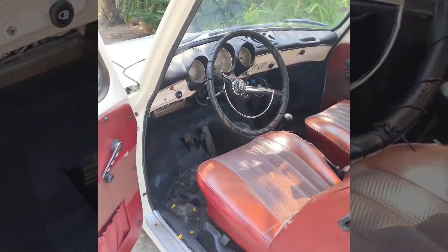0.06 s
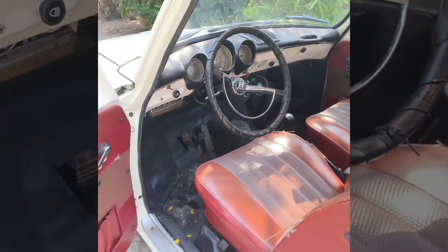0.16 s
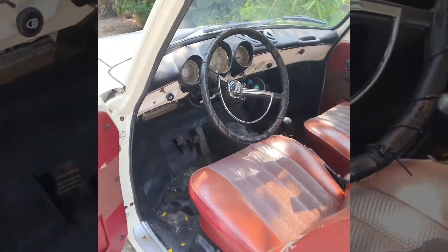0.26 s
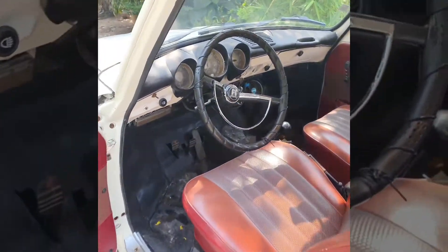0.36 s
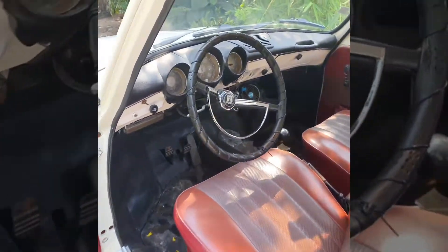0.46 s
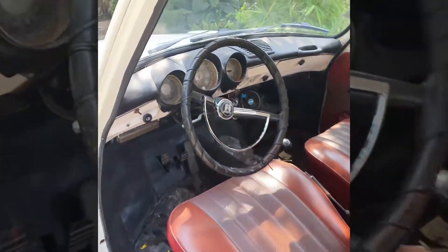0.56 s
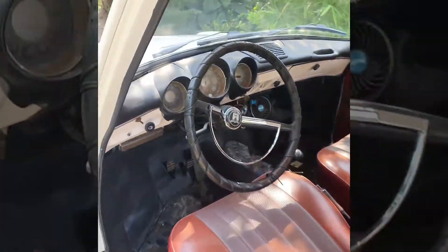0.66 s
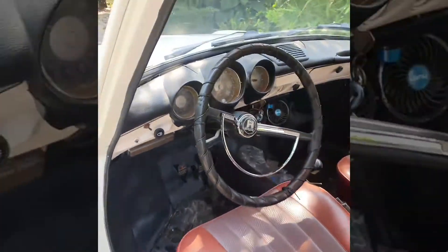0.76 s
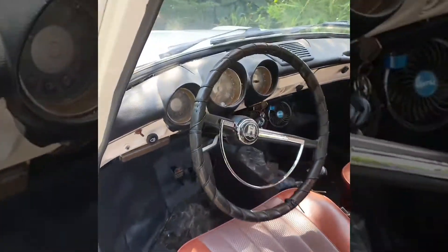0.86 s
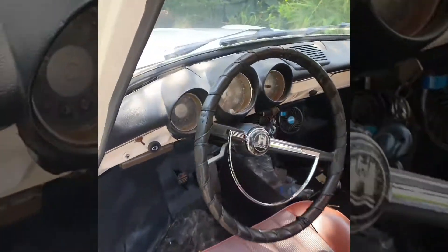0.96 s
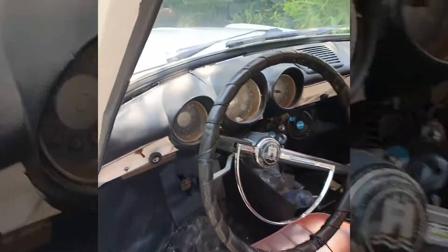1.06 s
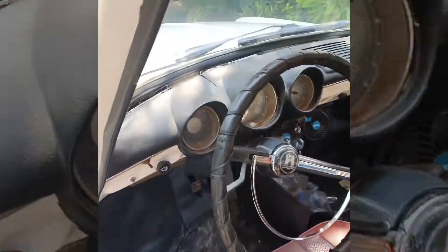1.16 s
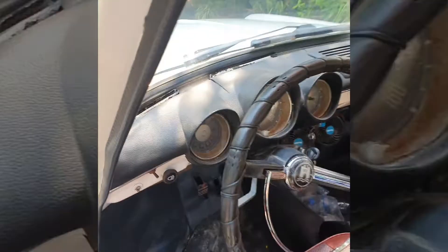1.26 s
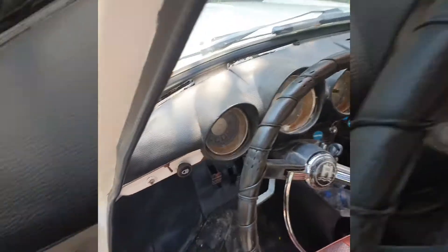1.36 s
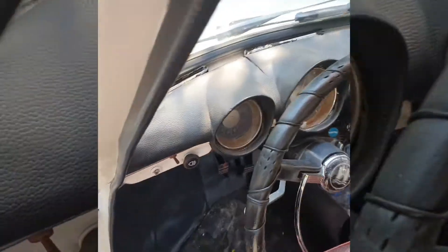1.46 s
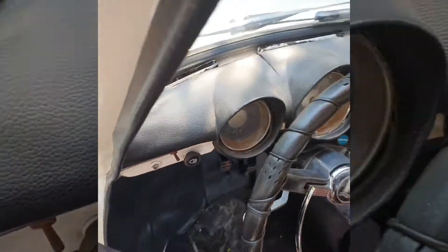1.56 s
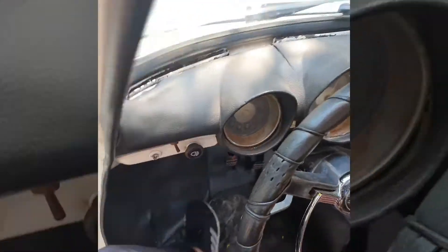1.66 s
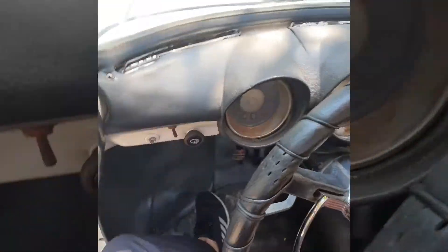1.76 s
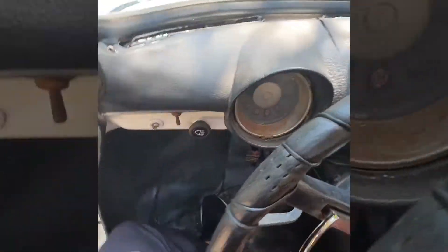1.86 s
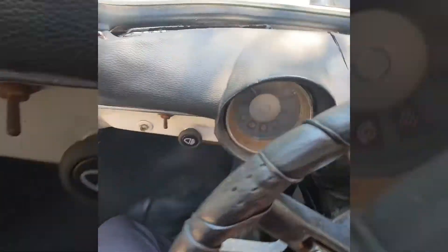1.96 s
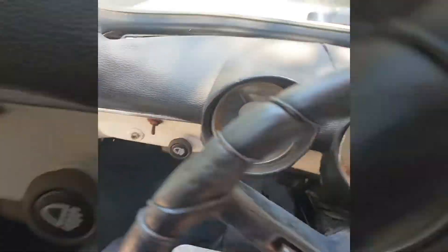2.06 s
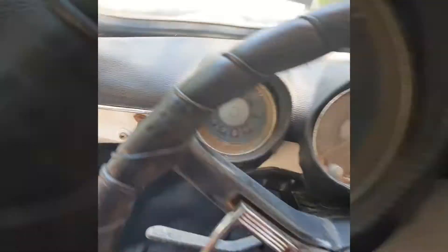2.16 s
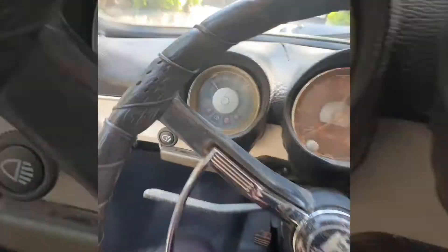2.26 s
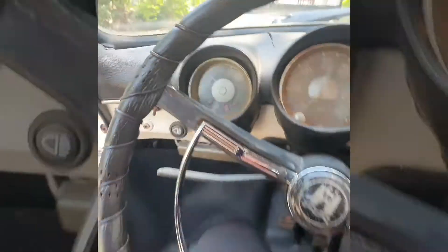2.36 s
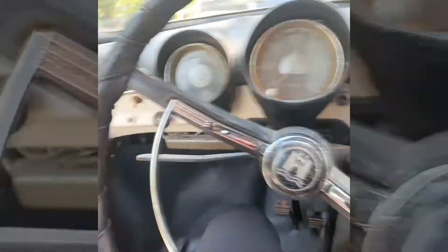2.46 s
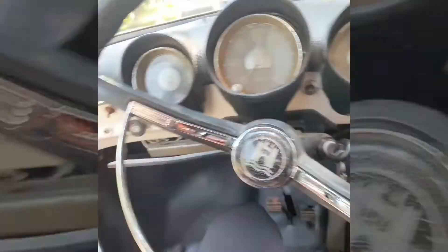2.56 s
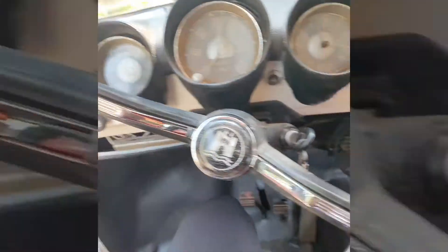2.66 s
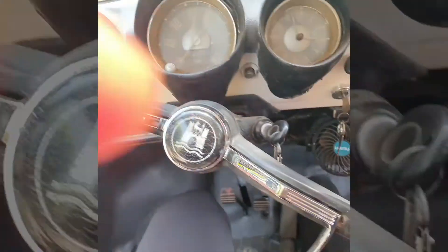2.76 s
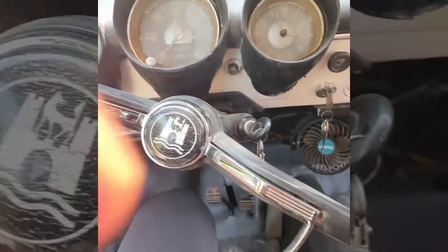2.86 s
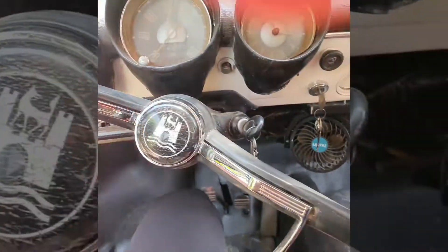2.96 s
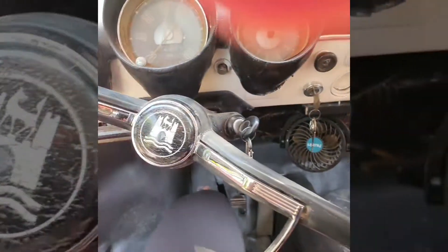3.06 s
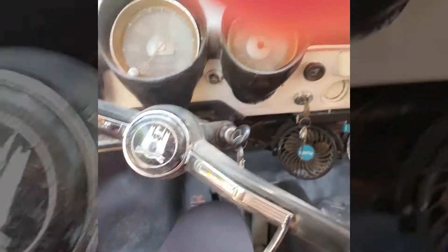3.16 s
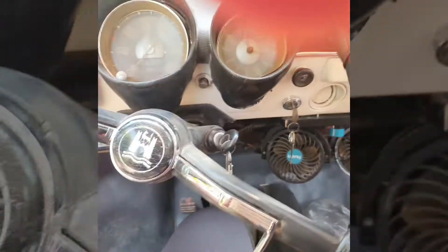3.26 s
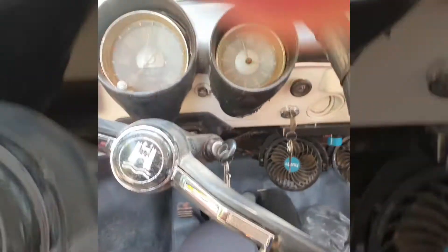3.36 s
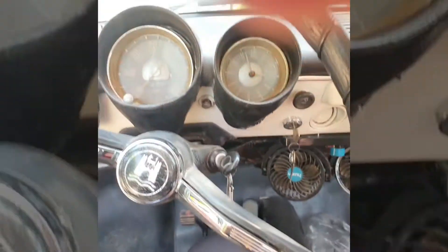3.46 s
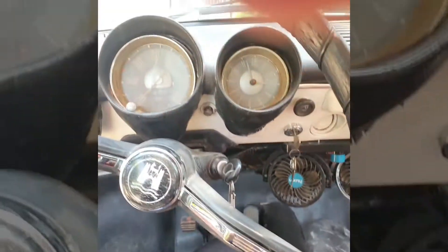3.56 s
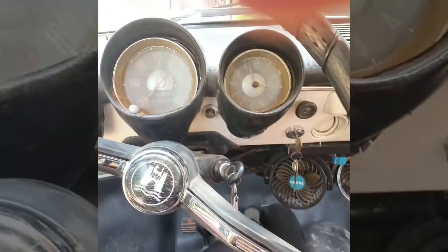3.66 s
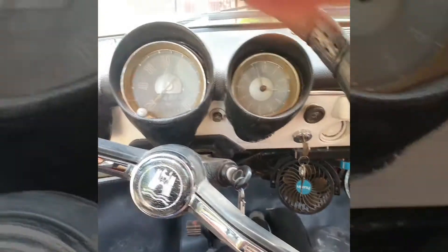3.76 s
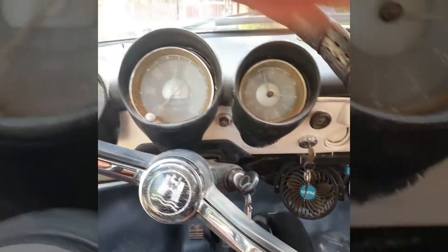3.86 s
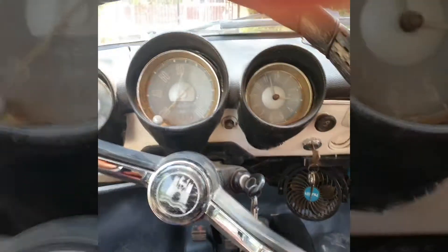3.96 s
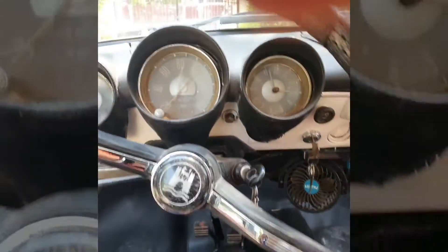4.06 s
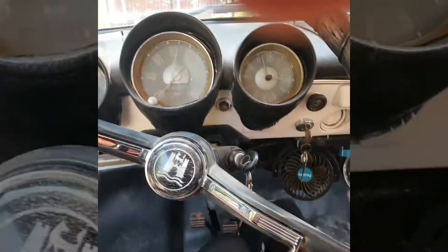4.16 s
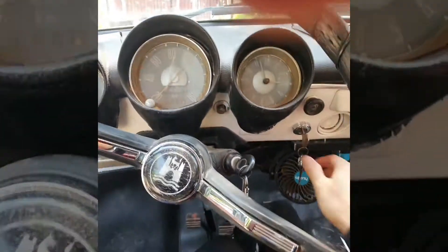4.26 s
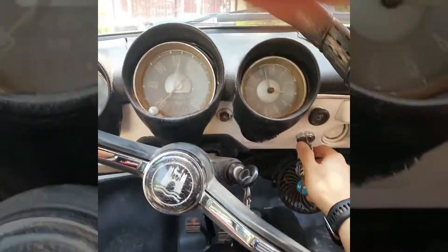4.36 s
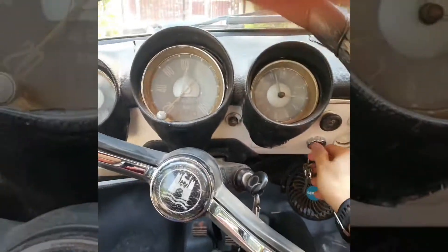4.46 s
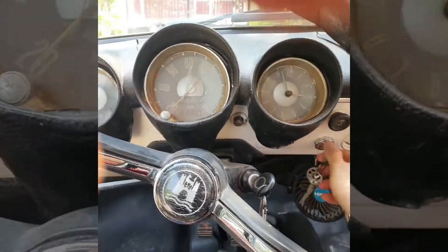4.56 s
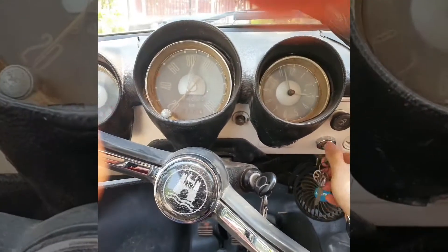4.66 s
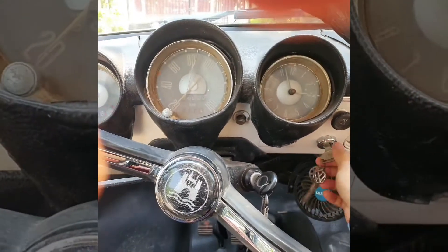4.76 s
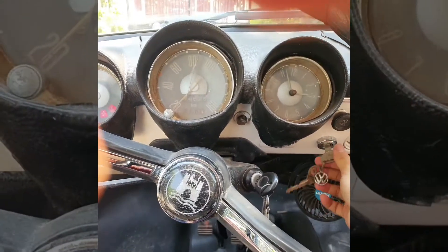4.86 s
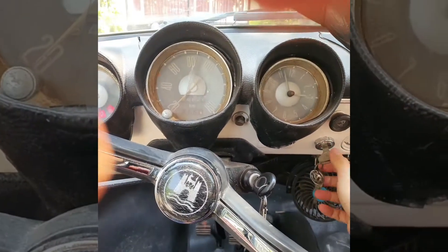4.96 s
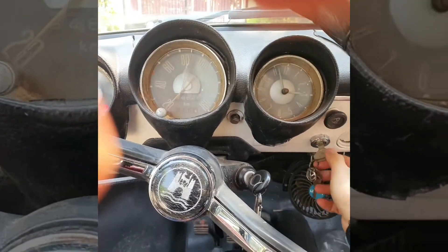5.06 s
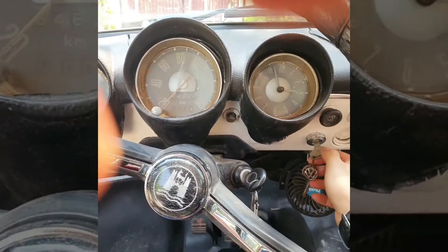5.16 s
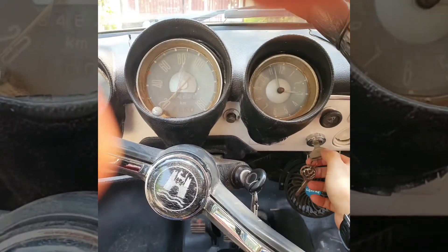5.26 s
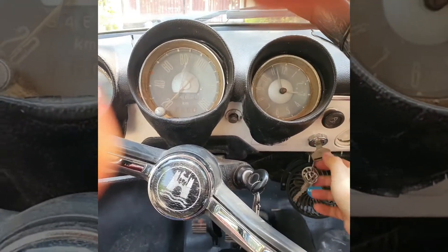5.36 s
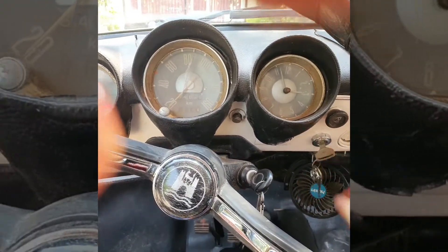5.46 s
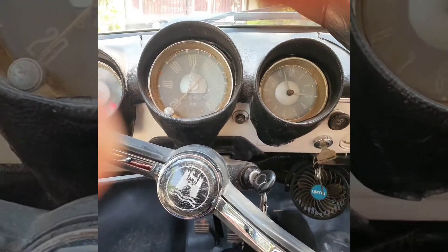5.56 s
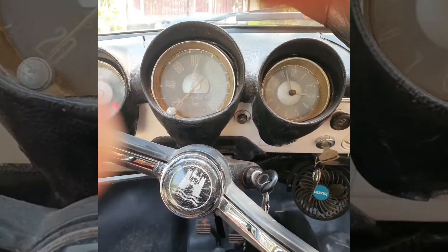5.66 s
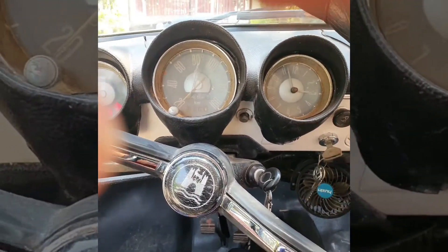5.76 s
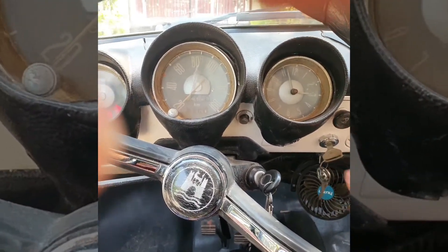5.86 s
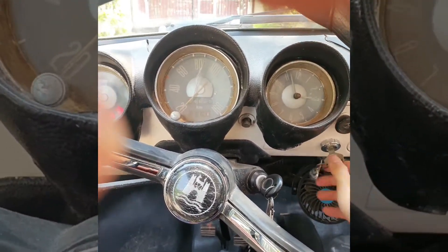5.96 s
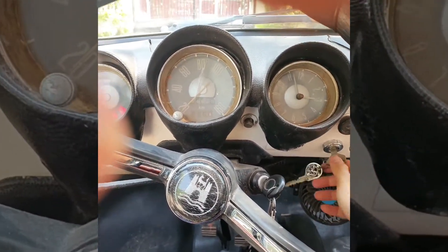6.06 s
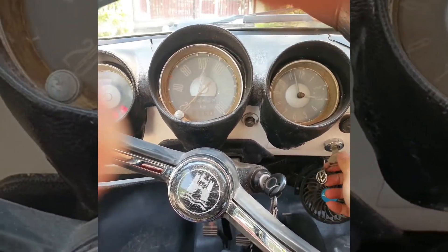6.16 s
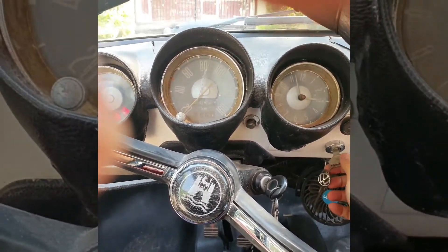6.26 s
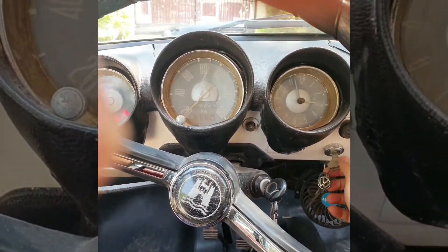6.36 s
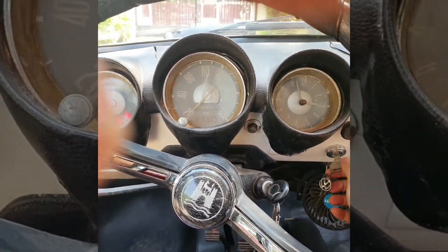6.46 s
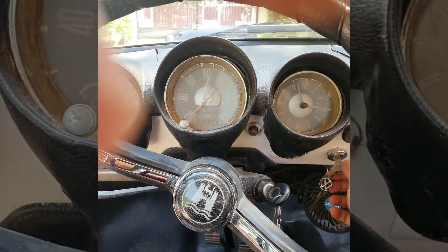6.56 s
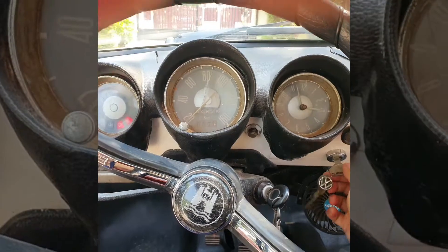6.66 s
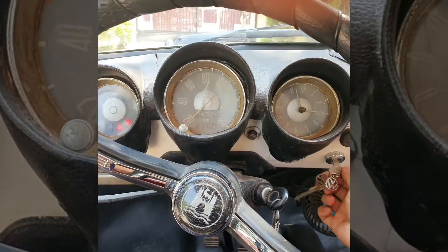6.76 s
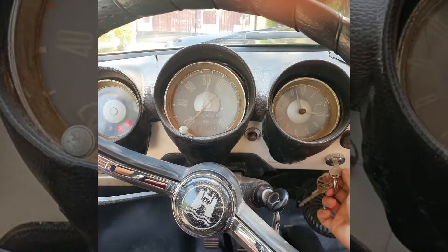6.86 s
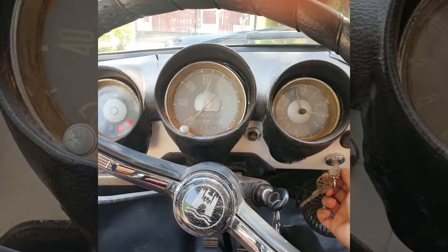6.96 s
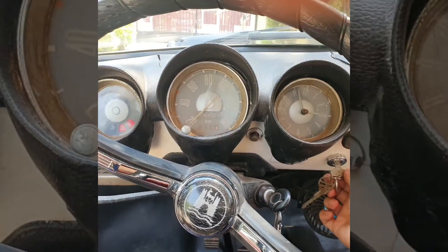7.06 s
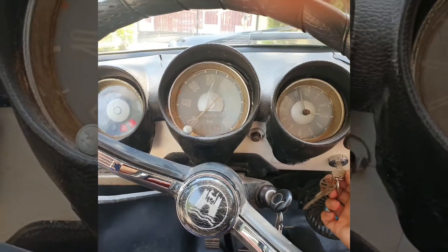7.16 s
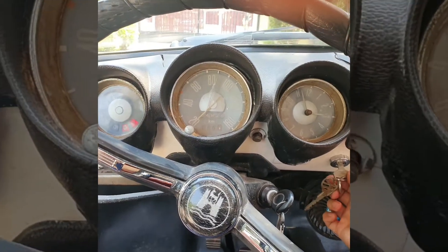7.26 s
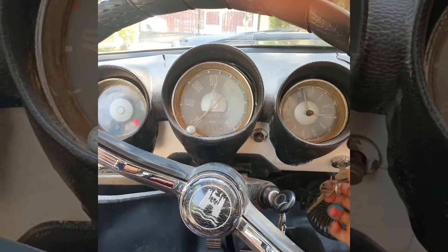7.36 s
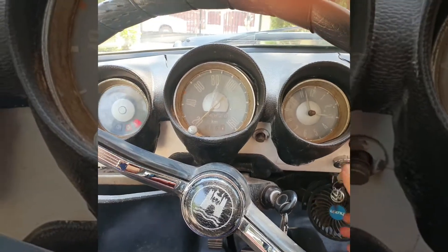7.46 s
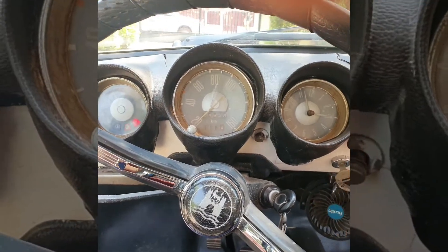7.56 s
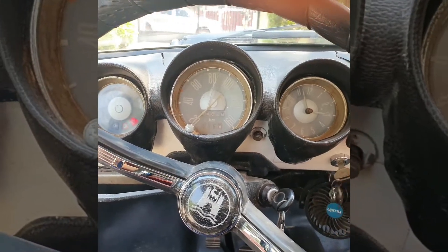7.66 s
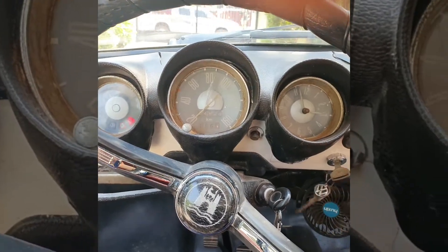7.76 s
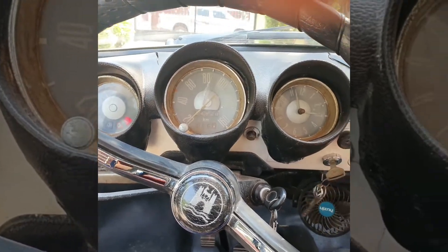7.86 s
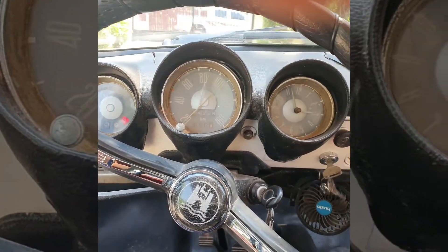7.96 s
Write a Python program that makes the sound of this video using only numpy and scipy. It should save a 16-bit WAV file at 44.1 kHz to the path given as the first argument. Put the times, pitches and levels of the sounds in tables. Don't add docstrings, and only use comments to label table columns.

```python
import sys
import numpy as np
from scipy import signal
from scipy.fft import rfft, irfft
from scipy.io import wavfile
from scipy.ndimage import uniform_filter1d

SR = 44100
rng = np.random.default_rng(int(sys.argv[2]) if len(sys.argv) > 2 else 0)


def attenuation_scalar(level_db):
    decades = np.asarray(level_db, float) / 20
    return 10 ** decades


def waveform_to_disk(signal):
    frames = np.transpose(np.atleast_2d(signal))
    scaled = np.clip(frames, -1, 1) * 32767
    samples = np.round(scaled).astype(np.int16)
    wavfile.write(sys.argv[1], SR, samples)


N = 352800
ENGAGE_S = 6.838


def unit(x):
    return x / np.sqrt(np.mean(x ** 2))


def lean(db):
    return attenuation_scalar(np.array([[db], [-db]]) / 2)


def add_at(out, s, sound):
    out[..., int(s * SR):][..., :sound.shape[-1]] += sound


def curves(table):
    s, *columns = np.transpose(table)
    t = np.minimum(np.arange(N) / SR, 7.95)
    return [np.interp(t, s, c, -120, -120) for c in columns]


def ring(x, hz, width):
    hz_safe = min(hz, .45 * SR)
    return signal.lfilter(*signal.iirpeak(hz_safe, hz / width, fs=SR), x)


def body(x, modes):
    knots = np.arange(0, N, 3000)
    y = np.zeros(N)
    for k, (hz, width, db) in enumerate(modes):
        swell = np.interp(np.arange(N), knots, attenuation_scalar(db + 3.0 * rng.standard_normal(len(knots))))
        y += (-1) ** k * swell * ring(x, hz, 0.84 * width) / np.sqrt(width)
    dull_hz = min(1.6 * modes[-1][0], .45 * SR)
    return unit(signal.lfilter(*signal.butter(1, dull_hz, fs=SR), y))


def shaped(x, points):
    hz, db = np.transpose(points)
    f = np.arange(N // 2 + 1) * SR / N + 1
    return irfft(rfft(x) * attenuation_scalar(np.interp(np.log(f), np.log(hz), db)), N)


def walk(rate):
    k = int(SR / rate)
    return unit(uniform_filter1d(np.repeat(rng.standard_normal(N // k + 1), k), k)[:N])


# frequency [Hz], side minus mid [dB].
SIDE_WIDTH = [(50, -9.5), (125, -13), (250, -10.5), (500, -8), (1000, 0.5), (15000, 0)]


def wide(make):
    mid, side = make(), shaped(make(), SIDE_WIDTH)
    return np.array([mid + side, mid - side]) / np.sqrt(2)


def bursts(times, db, t60, rise):
    out, t = np.zeros(N + SR), np.arange(SR // 2) / SR
    for s, d, fall in zip(times, db, np.maximum(t60, .01)):
        add_at(out, s, attenuation_scalar(d - 60 * t / fall) * (1 - np.exp(-t / (rise * fall))))
    return out[:N]


# frequency [Hz], width [Hz], level [dB].
CUSHION = [(105, 44, -3.5), (167, 15.2, 0), (194.8, 66.4, 1), (239.4, 72, 2), (320, 65, -5)]
PANELS = [(374, 44, -7), (472, 50, -0.5), (582.6, 63, -3), (724, 164, -4), (920, 190, -3), (1170, 225, -4),
          (1520, 850, -10.5)]
VINYL = [(1660, 440, -7), (1926, 114, -6), (2140, 157, -7), (2700, 530, -3.5), (3260, 830, -4),
         (4320, 1110, -7)]
CLOTH = [(5620, 1160, -0.5), (7340, 1470, 2.5), (12300, 7300, 1.5)]


def layers(levels_db, grit, flicker_db):
    shake = attenuation_scalar(flicker_db * walk(42))
    gains = [attenuation_scalar(db + 1.5 * walk(14)) for db in levels_db]

    def make():
        slips = grit() * shake
        return sum(g * body(slips, modes) for g, modes in zip(gains, (CUSHION, PANELS, VINYL, CLOTH)))
    return wide(make)


def sway(hz, wander):
    return np.cumsum(np.clip(hz, 20, 90) * (1 + wander * walk(15))) / SR


def swells(s, db, length):
    t = np.arange(0, N, 64)[:, None] / SR
    rise = np.where(s < ENGAGE_S, 0.65, 0.91)
    away = np.where(t < s, (s - t) / rise, t - s) / length
    drop_db = 20.5 * away ** 1.46
    power = attenuation_scalar(db - drop_db) ** 2 * ((s < ENGAGE_S) | (t > ENGAGE_S))
    level_db = 10 * np.log10(power.sum(1) + 1e-12)
    return uniform_filter1d(np.repeat(level_db, 64)[:N], size=256)


# peak time [s], level [dB], pitch [Hz], length [s].
JOLTS = [(1.949, -24, 37.95, 0.067), (2.186, -27.5, 49, 0.14), (2.353, -38, 49.2, .3),
         (2.535, -33, 48.9, 0.16), (2.808, -40, 47, 0.45), (3.282, -36.5, 45.2, 0.15),
         (3.643, -35, 45, 0.075), (3.824, -24, 50.2, 0.096), (4.12, -22.5, 45.33, .13),
         (4.331, -34, 50.2, 0.11), (4.468, -39.5, 50.4, 0.16), (4.848, -39.5, 45.04, 0.18),
         (5.151, -48, 40.98, 0.68), (5.497, -43, 42.87, 0.16), (5.699, -21, 47.2, 0.073),
         (5.841, -31, 46.65, 0.26), (6.05, -32.5, 45.34, 0.39), (6.239, -38.5, 45, 0.092),
         (6.45, -43.5, 45.07, 0.64), (6.741, -39, 55.9, 0.53)]
# peak time [s], level [dB], pitch [Hz], length [s], upper mode share [dB].
STROKES = [(6.855, -18.5, 48.1, 0.12, 7), (6.949, -23, 36, 0.14, -1.5), (7.038, -23, 40.07, 0.048, -15),
           (7.144, -23, 41.56, 0.066, -5.5), (7.25, -19.5, 43.04, 0.064, -10),
           (7.331, -8, 48.5, 0.092, -11.5), (7.419, -21.5, 43.03, 0.081, -14),
           (7.488, -12.5, 46.52, 0.095, -7), (7.629, -10, 42.94, 0.087, -10), (7.802, -13, 37.9, 0.15, -15),
           (7.968, -11, 41.65, 0.16, -9)]


def boom():
    jolts = [(*row, -8.5 - 38 * row[-1]) for row in JOLTS]
    s, peak_db, pitch, length, share_db = np.transpose(jolts + STROKES)
    db = swells(s, peak_db, length)
    turns = sway(np.interp(np.arange(N) / SR, s, pitch), .02)
    skirt = unit(ring(ring(rng.standard_normal(N), 38.3, 37), 36.5, 49))
    low = attenuation_scalar(db) * (np.sqrt(2) * np.sin(2 * np.pi * turns) + attenuation_scalar(-6.0) * skirt)
    upper_db = swells(s, peak_db + share_db, 1.18 * length)
    upper = attenuation_scalar(upper_db) * np.sqrt(2) * np.sin(2 * np.pi * sway(68, 0.0608))
    return (low + upper) * lean(-1.6), turns % 1, db


# time [s], level [dB].
STARTER_WHINE = [
    (7.1, -86),
    (7.19, -54),
    (7.3, -49),
    (7.36, -85),
]
# time [s], load [dB], clatter [dB].
CRANK = [
    (6.8, -36, -45.5),
    (6.86, -24.5, -49.5),
    (7.04, -37, -55.5),
    (7.18, -33, -55.5),
    (7.31, -29.5, -40.5),
    (7.44, -30.5, -37.5),
    (7.54, -29.5, -45.5),
    (7.8, -36, -53),
    (7.96, -28, -47.5),
]


def engine(phase):
    puff = .8 + np.exp(-phase / .25)
    whine = attenuation_scalar(curves(STARTER_WHINE)[0]) * unit(ring(rng.standard_normal(N), 3320, 100))
    load, clatter = curves(CRANK)
    block = -3.5 + 0.62 * load + 0.38 * clatter
    air = clatter - 6.5
    return layers((load, block, clatter, air), lambda: puff * rng.standard_normal(N), 0.84) + whine


# time [s],
# peak level [dB], thud pitch [Hz], hardness [dB], decay t60 [s].
SEAT_KNOCKS = [(1.793, -21.5, 310, -12.5, 0.1), (1.898, -21, 135, -19, 0.11),
               (2.019, -20.5, 272, -6.5, 0.12), (2.043, -17, 162.4, -24.5, 0.16),
               (2.207, -23, 200.6, -3, 0.32), (2.452, -10, 468.5, -21.5, 0.1),
               (2.967, -29.5, 320, -15.5, 0.17), (3.605, -24.5, 279, -24, 0.15),
               (3.678, -17, 132, -27.5, 0.11), (3.713, -18.5, 226, -17, .1),
               (3.781, -14.5, 179.7, -33, 0.079), (3.796, -12, 138.5, -36, 0.16),
               (3.932, -20.5, 132.3, -23, 0.11), (3.953, -19, 145, -31, 0.13),
               (4.016, -6.5, 478, -15.5, 0.14), (4.664, -39.5, 460, -13, 0.077),
               (5.499, -38, 160, -37, 0.16), (5.743, -25, 131, -19, 0.099)]
HARD_KNOCKS = [(0.677, -46.5, 202, -9, 0.17), (4.06, -13, 612, -18.5, 0.087), (4.497, -39.5, 583, 5, 0.097),
               (4.822, -20.5, 427, -5.5, 0.12), (5.667, -28, 583.4, -22, .25),
               (5.704, -14.5, 232.3, -24.5, 0.1), (6.18, -43, 151, -4, 0.11), (6.575, -33, 503, -31, 0.16),
               (6.774, -31, 543, -7.5, 0.1), (6.813, -26.5, 597, -10, 0.22),
               (6.838, -19.5, 176.9, -19.5, .2), (7.313, -18, 160.4, -23, 0.31),
               (7.425, -23.5, 195, -6, 0.19), (7.489, -25.5, 138, -12, .14), (6.958, -23, 105, -38, .1),
               (7.144, -26, 105, -36, 0.11), (7.203, -27, 105, -30, .1), (7.398, -22, 170.2, -30, .1),
               (7.561, -24, 175, -36, .12), (7.806, -31, 117.9, -36, 0.11), (7.853, -31, 129, -38, .1)]
# offset [dB], tick per hardness [dB/dB].
SEAT_TICK = (-3, 1.42)
HARD_TICK = (-0.92, 0.94)


def knocks():
    s, peak_db, hz, hardness_db, t60 = np.transpose(SEAT_KNOCKS + HARD_KNOCKS)
    ticks = [SEAT_TICK] * len(SEAT_KNOCKS) + [HARD_TICK] * len(HARD_KNOCKS)
    offset_db, slope = np.transpose(ticks)
    crack_db = peak_db + hardness_db
    tick_db = peak_db + offset_db + slope * hardness_db
    thud, t = np.zeros(N + SR), np.arange(SR // 2) / SR
    for at, db, f, fall in zip(s, peak_db, hz, t60):
        swing = (1 - np.exp(-t / 0.0015)) * np.sin(2 * np.pi * f * t)
        overtones = f * 2 ** (.6 + 2.2 * rng.random((4, 1)))
        loose = attenuation_scalar(-12.5 - 280 * t) * (f / overtones) ** 0.54 * np.sin(2 * np.pi * overtones * t)
        swing = swing + loose.sum(0) * (1 - np.exp(-t / 0.00091))
        add_at(thud, at, attenuation_scalar(db - 4.5 - 60 * t / max(0.84 * fall, .01)) * swing)
    hard_db = 1.44 * np.log2(hz / 300)
    rattle = [(peak_db - 6.5 + hard_db, 1.1, PANELS), (peak_db - 7.0 - hard_db, 1.5, CUSHION),
              (crack_db + 2.0, .9, VINYL), (tick_db - 1.5, .8, CLOTH)]
    chatter = attenuation_scalar(1.6 * walk(140))
    parts = [(bursts(s, db, k * t60, 0.024) * chatter, modes) for db, k, modes in rattle]
    return thud[:N] + wide(lambda: sum(e * body(rng.standard_normal(N), modes) for e, modes in parts))


# time [s], pressure [dB], slip brightness [dB].
SITTING = [
    (1.76, -51.5, 0),
    (1.88, -61, 9.5),
    (2.17, -36.5, -6),
    (2.24, -32, -0.5),
    (2.44, -38.5, 0.5),
    (2.53, -36.5, -10.5),
    (2.68, -43, -9),
    (2.82, -40.5, -9.5),
    (2.92, -48, -10.5),
]
SETTLING = [
    (3.0, -38, -9.5),
    (3.2, -38, -11.5),
    (3.4, -42.5, -9.5),
    (3.52, -46.5, -6),
    (3.76, -47.5, -12.5),
    (3.9, -45.5, -13),
    (4.13, -46, -15),
    (4.22, -52.5, -11),
    (4.33, -46, -10),
]
REACHING = [
    (4.599, -57, -5),
    (4.92, -57, -8.5),
    (5.2, -71, -7),
    (5.47, -53.5, -11),
    (5.62, -62, -7),
    (5.8, -51, -22),
    (6.22, -57.5, -4),
    (6.4, -60, -15),
    (6.8, -49, 0.5),
]
# time [s], level [dB].
SLIDE = [
    (1.4, -69),
    (1.47, -51),
    (1.6, -50),
    (1.75, -49.5),
    (1.8, -43.5),
]
# frequency [Hz], width [Hz], level [dB].
SLIDE_BANDS = [(320, 200, -8.5), (842, 120, -6.5), (1670, 87, -11), (2020, 100, -17), (2550, 220, -7.5),
               (3360, 430, -6.5), (5470, 3600, -3), (13300, 5000, -8)]
# time [s], pitch [Hz], level [dB].
SQUEAL = [
    (2.19, 2910, -55),
    (2.22, 2700, -33),
    (2.27, 2035, -24.5),
    (2.31, 2140, -54),
    (2.4, 2330, -57),
    (2.48, 2320, -58),
]


def rubbing(shell_db):
    press, bright = curves(SITTING + SETTLING + REACHING)
    still_db = -5.5 * np.clip(np.arange(N) / SR - 4.64, 0, 1)
    cushion = press + 4.5 + still_db + 0.18 * (shell_db + 39.5)
    cloth = press - 3.5 + 1.45 * bright
    drag = layers((cushion, press, press + bright, cloth),
                  lambda: rng.standard_normal(N) * attenuation_scalar(3.0 * rng.exponential(size=N)), 1.6)
    slide = wide(lambda: attenuation_scalar(curves(SLIDE)[0] + 2.4 * walk(39.04)) * body(rng.standard_normal(N), SLIDE_BANDS))
    hz, db = curves(SQUEAL)
    carrier = np.exp(2j * np.pi * np.cumsum(hz) / SR)
    squeal = wide(lambda: attenuation_scalar(db) * (carrier * (walk(700) + 1j * walk(650))).real)
    return drag + slide + squeal


# time [s], peak level [dB].
ZIP_TICKS = [
    (2.5361, -40),
    (2.548, -34.5),
    (3.142, -27),
    (3.1637, -31),
    (3.1768, -27.5),
    (3.19, -32.5),
]


def zip_pull():
    s, peak_db = np.transpose(ZIP_TICKS)
    envelope = bursts(s, peak_db - 3, np.full(len(s), .022), .03)
    return wide(lambda: envelope * unit(ring(rng.standard_normal(N), 6800, 4500))) * lean(-5)


# time [s], tick [dB], long key [dB], bunch [dB],
# place struck [1 short keys, 2 ring, 3 fob].
KEYS = [(4.495, -27, -68, -46, 2.8), (4.9038, -47, -55, -57, 2.3), (4.952, -30.5, -77, -53, 3.5),
        (5.012, -47, -80, -59, 2.6), (5.034, -42, -72, -52, 2.7), (5.0564, -41, -67, -50.5, 2.3),
        (5.311, -35, -73, -45.5, 3.9), (5.425, -24.5, -52, -43, 3), (6.0003, -22, -64, -31, 3.2),
        (6.0194, -22, -67, -46, 3.3), (6.031, -32, -75, -50, 2.2), (6.062, -42, -58, -54, 2.8),
        (6.1143, -34, -44, -33.5, 2.06), (6.1394, -45, -47, -49, 2.1), (6.1948, -42, -54, -56, 2.2),
        (6.2287, -37, -60, -49, 2.46), (6.2547, -39, -76, -53, 1.1), (6.312, -50, -80, -66, 1),
        (6.6714, -54, -81, -60, 1.46), (6.705, -47, -70, -53, 2.4), (6.985, -43, -69, -61, 1),
        (7.4717, -31, -55, -33, 2.9), (7.64, -40, -53, -36.5, 1.8), (7.763, -28, -54, -36, 2.8),
        (7.7991, -49, -55, -49, 1.75)]
# frequency [Hz], level [dB], decay t60 [s], piece [0 long key, 1 to 3 as above].
KEY_MODES = [(6215, 0, .24, 0), (4570, -25, .09, 1), (5750, -7, .05, 1), (6794, -6, .06, 1),
             (7880, -2, .12, 1), (8950, -14, .04, 2), (9840, -5, .1, 2), (10300, -3, .12, 2),
             (11090, -11, .07, 2), (11870, -7, .06, 3), (12135, -1, .08, 3), (12910, -3, .11, 3),
             (14060, -14, .04, 3), (14480, 2, .05, 3)]


def keys():
    out, t = np.zeros((2, N + SR)), np.arange(SR // 4) / SR
    hz, mode_db, t60, piece = np.transpose(KEY_MODES)[:, :, None]
    for at, peak_db, long_db, bunch_db, place in KEYS:
        c = rng.standard_normal((4, 2, len(hz), 1))
        piece_db = bunch_db - 6 * abs(piece - place)
        db = np.where(piece < .5, long_db, piece_db) + mode_db + 2.66 * c[0, 0] + 3.0 * c[1] + 2.0
        fall = t60 * attenuation_scalar(0.59 * c[2, 0])
        pitch = hz * (1 + 0.00089 * c[2, 1])
        lines = attenuation_scalar(db - 60 * t / fall) * np.sin(2 * np.pi * pitch * t + 2 * c[3])
        beat_hz = 45 * attenuation_scalar(3.1 * c[0, 1])
        lines = lines * (1 + 0.29 * np.sin(2 * np.pi * beat_hz * t + 3 * c[1]))
        tick = attenuation_scalar(peak_db - 13.5 - 60 * t / 0.065) * ring(rng.standard_normal((2, len(t))), 9800, 11000)
        here = out[:, int(at * SR):][:, :len(t)]
        here *= 1 - 0.68 * (1 - np.exp(-t / 0.0036))
        here += (lines.sum(1) + tick) * (1 - np.exp(-t / 0.00062))
    return out[:, :N] * lean(3.2)


# time [s], peak level [dB], centre [Hz], decay t60 [s].
SCUFFS = [(0.0094, -43, 2630, 0.026), (0.0887, -49, 2480, 0.046), (0.4238, -52, 1670, 0.043),
          (0.564, -41.5, 890, 0.19), (0.5746, -42, 3000, 0.14), (0.687, -39, 6500, 0.15),
          (0.736, -35.5, 2900, 0.055), (0.8, -37.5, 3400, 0.014), (0.9287, -54, 4700, 0.094),
          (1.1, -41.5, 1100, 0.2), (1.142, -47, 2260, 0.24), (1.188, -45.5, 2410, 0.23),
          (2.839, -37, 890, 0.13), (3.0256, -40, 890, 0.1), (3.531, -52, 1190, 0.32),
          (4.4556, -40, 1100, 0.32), (4.8036, -29, 1650, 0.11), (5.662, -36, 599.5, 0.06),
          (6.526, -47, 2500, 0.11), (6.553, -39.5, 2200, 0.13)]


def scuffs():
    out, t = np.zeros((2, N + SR)), np.arange(SR // 4) / SR
    for at, db, hz, fall in SCUFFS:
        pan_db = -5 if at < 4 else 9
        slips = attenuation_scalar(2.7 * np.repeat(rng.standard_normal(len(t) // 105), 105))
        noise = rng.standard_normal((2, len(t))) * slips
        near = hz * np.append(1, 2 ** (0.595 * rng.standard_normal(3)))
        grain = 0.5 * unit(ring(noise, hz, 1.4 * hz))
        grain += sum(unit(ring(ring(noise, f, 0.24 * f), f, 0.46 * f)) for f in near) / 2.3
        grain += 0.44 * unit(ring(noise, 1.9 * hz, 2.0 * hz))
        grain += attenuation_scalar(-44) * unit(np.diff(noise, prepend=0))
        shape = attenuation_scalar(db - 7.5 - 60 * t / max(fall, .004)) * (1 - np.exp(-t / (0.035 * fall)))
        add_at(out, at, grain * shape * lean(pan_db))
    return out[:, :N]


# time [s], peak level [dB], centre [Hz], left minus right [dB].
GRIT = [(0.3556, -59, 2350, -3.5), (0.408, -53, 2340, -8), (0.4604, -60, 3720, -5.0),
        (0.4974, -51, 7540, -7), (0.5904, -42, 2180, -3.0), (0.6124, -47, 2160, -5.0),
        (0.676, -40.5, 8410, -5.0), (0.706, -39, 3280, -8), (0.7474, -42.5, 2250, -7),
        (0.8736, -58, 3220, -6.0), (0.8954, -62, 2490, -6), (0.9532, -55, 2570, -6.0),
        (1.0061, -59, 2550, -6.0), (1.112, -45.5, 3630, -3.5)]
CREAKS = [(2.6074, -28, 1017, 5.0), (2.6389, -46, 1150, 0.0), (2.6808, -39, 1160, -2.0),
          (2.7112, -39, 1150, -2.5), (2.7728, -39, 2290, -4), (2.801, -37, 1100, -1.5),
          (2.8524, -36, 1010, 0.0), (2.9674, -33.5, 1890, 2.5), (3.0006, -39, 1030, 1.5),
          (3.0374, -39, 1830, 2.0), (3.0649, -33, 1110, 1.5), (3.0827, -33, 1070, 0.5),
          (3.1144, -37, 1010, 1.5), (3.1344, -35, 1520, 0.5), (3.2014, -35, 1050, 0.0),
          (3.2555, -36, 1390, -0.5), (3.2879, -36, 1860, 6), (3.329, -35, 1010, 1.0),
          (3.3713, -36, 1000, 2.0), (3.3884, -35, 1040, 6), (3.4281, -37, 1180, 9),
          (3.474, -39, 1860, 10.0)]


def cracks():
    out, t = np.zeros((2, N + SR)), np.arange(SR // 20) / SR
    for table, fall, trim_db in ((GRIT, .022, -6), (CREAKS, .025, -5)):
        for at, db, hz, pan_db in table:
            noise = rng.standard_normal((2, len(t)))
            noise = noise + 1.1 * noise.sum(0)
            high = 1.7 * hz
            click = unit(ring(ring(noise, hz, 0.73 * hz), hz, 1.3 * hz))
            click += .45 * unit(ring(ring(noise, high, high), high, high))
            shape = attenuation_scalar(db + trim_db - 60 * t / fall) * (1 - np.exp(-t / 0.00068))
            add_at(out, at, click * shape * lean(pan_db))
    return out[:, :N]


# peak time [s], level [dB], pitch [Hz], length [s].
TINWARE = [(6.902, -34, 298, .08), (6.94, -41, 590, 0.067), (7.07, -41, 463.4, 0.098),
           (7.119, -48, 1125, 0.051), (7.16, -44, 598.6, 0.049), (7.33, -34.5, 470, 0.083),
           (7.41, -36, 470, 0.057), (7.5, -36, 448, 0.049), (7.601, -38, 301.7, .08),
           (7.74, -42, 457.8, 0.061), (7.9, -41.5, 524, 0.088), (7.96, -43.5, 1142, 0.038)]
HOLLOWS = [(.098, -57, 2620, .013), (.098, -61, 1790, .013), (0.419, -64, 330, 0.064),
           (1.12, -64, 308, 0.14), (1.9, -41, 201, .07), (2.25, -39, 870, 0.055), (2.47, -31, 475, 0.028),
           (3.57, -50.5, 1150, 0.063), (4.041, -27, 271, 0.046), (4.2, -48.5, 250, .12),
           (4.329, -45.5, 361, 0.074), (5.471, -52.5, 171, 0.081), (5.741, -42, 1210, 0.049),
           (6.15, -64, 938, 0.16), (6.589, -45, 400, 0.035), (7.36, -28.5, 150.2, 0.074)]


def tinware():
    out, t = np.zeros((2, N + SR)), np.arange(SR // 2) / SR - .25
    for s, db, hz, length in TINWARE + HOLLOWS:
        mid, side = ring(rng.standard_normal((2, len(t))), hz, 0.065 * hz + 8)
        side = side * min(hz / 1200, .9)
        shape = attenuation_scalar(db - 13 * (t / length) ** 2)
        rms = np.sqrt(np.mean((shape * mid) ** 2) / np.mean(shape ** 2))
        add_at(out, s, shape * np.array([mid + side, mid - side]) / rms)
    return out[:, SR // 4:][:, :N]


# frequency [Hz], level [dB per Hz].
TRAFFIC = [(20, -11), (45, 3), (72, -7), (150, -14.5), (310, -19.5), (600, -26), (1500, -35.5), (2500, -33),
           (6000, -41), (15000, -47.5)]
# time [s], pitch [Hz], level [dB].
HUM = [
    (0, 99, -63.5),
    (.25, 96.1, -58),
    (.5, 99.5, -72.5),
    (.75, 105.6, -57.5),
    (.97, 105, -72),
    (1.3, 105, -80),
]


def street():
    wash = wide(lambda: unit(shaped(rng.standard_normal(N) * attenuation_scalar(1.7 * walk(14)), TRAFFIC)))
    wash = wash * attenuation_scalar(-54.5 + 0.69 * walk(2.55))
    hz, db = curves(HUM)
    angle = 2 * np.pi * np.cumsum(hz * (1 + 0.013 * walk(7.0))) / SR
    level = attenuation_scalar(db + 6.0 + 2.6 * walk(11.3))
    octave = attenuation_scalar(-17.0 + 2.7 * walk(6.3)) * np.sin(2 * angle)
    return wash + level * (np.sin(angle) + octave)


# time [s], left minus right [dB].
TURNING = [(0.0, -3), (0.09, 0), (0.62, -5), (0.69, -5), (0.78, -5), (4.03, 2), (4.21, -1), (4.63, 3.0),
           (5.93, -1.0), (6.02, 3.5), (6.62, 0.5), (6.68, 2.5), (6.82, 0), (8.0, 1.5)]


def turned(x):
    bass = signal.lfilter(*signal.butter(1, 250, fs=SR), x)
    s, pan_db = np.transpose(TURNING)
    pan = np.interp(np.arange(N) / SR, s, pan_db)
    return bass + (x - bass) * attenuation_scalar(np.outer([.5, -.5], pan))


def cabin(clicks):
    t = np.arange(SR // 4) / SR
    tail = attenuation_scalar(-29.5 - 60 * t / 0.13) * rng.standard_normal((2, len(t)))
    return signal.fftconvolve(clicks, tail, axes=1)[:, :N]


def scene():
    shell, phase, shell_db = boom()
    clicks = keys() + scuffs() + cracks()
    tail = cabin(clicks)
    handled = turned(rubbing(shell_db) + engine(phase) + tinware() + knocks())
    return shell + handled + zip_pull() + clicks + tail + street()


def low_pass(x):
    return signal.sosfilt(signal.butter(12, 15460, fs=SR, output="sos"), x)


def record(dry):
    x = signal.sosfilt(signal.butter(2, 22, "high", fs=SR, output="sos"), dry)
    x = signal.sosfilt(signal.ellip(8, .5, 40, 14600, fs=SR, output="sos"), x)
    return low_pass(x)


dry = scene()
out = record(dry)
waveform_to_disk(out)
```